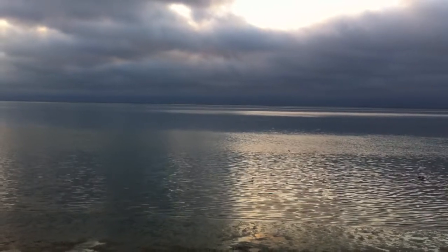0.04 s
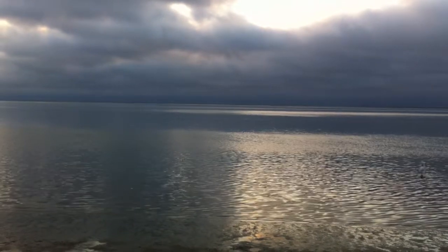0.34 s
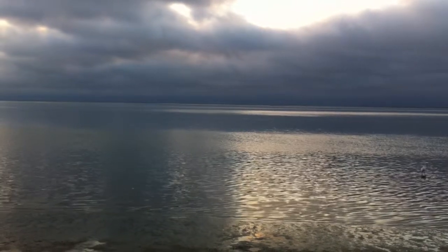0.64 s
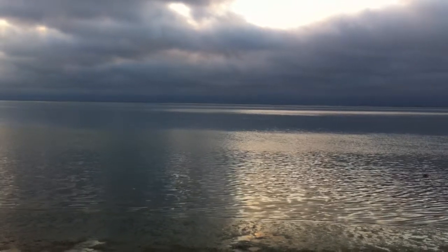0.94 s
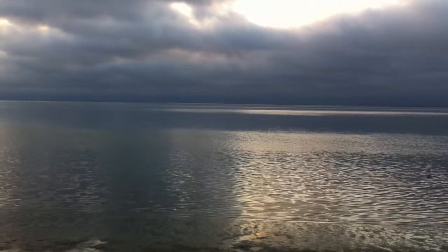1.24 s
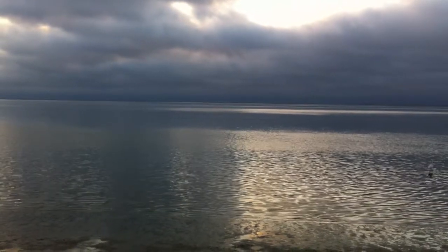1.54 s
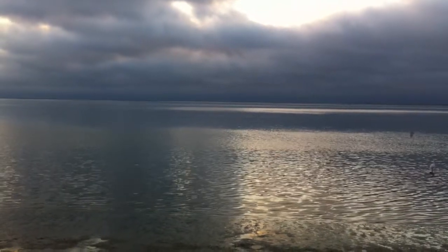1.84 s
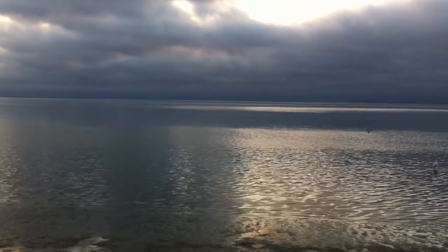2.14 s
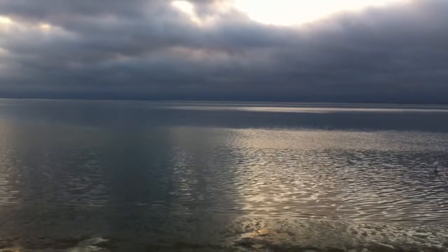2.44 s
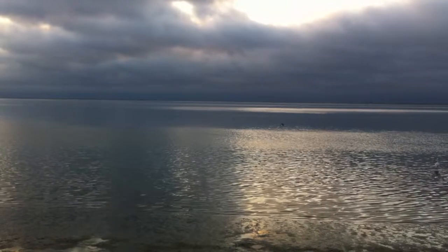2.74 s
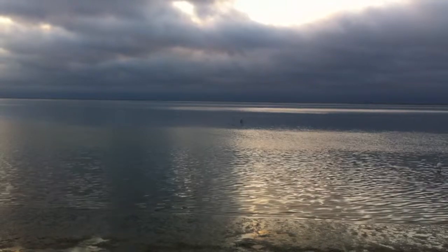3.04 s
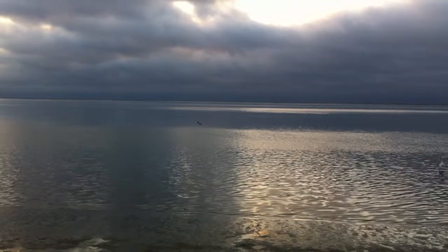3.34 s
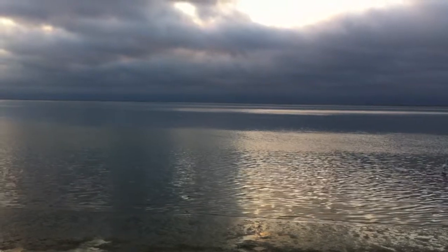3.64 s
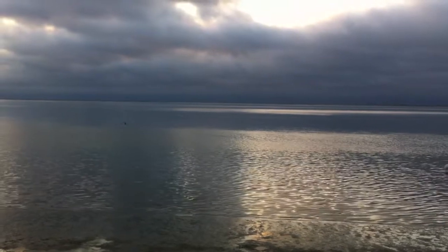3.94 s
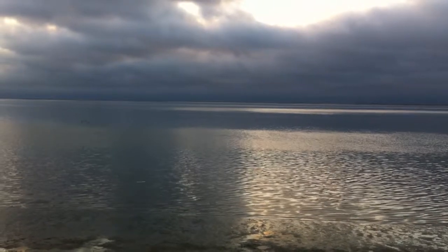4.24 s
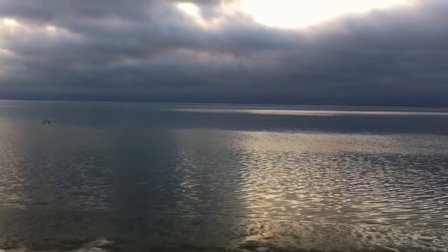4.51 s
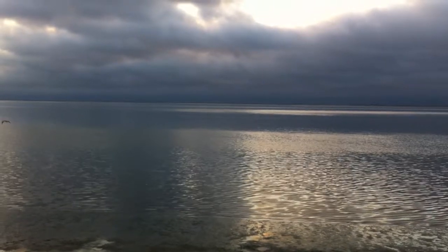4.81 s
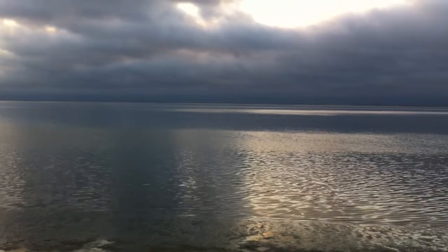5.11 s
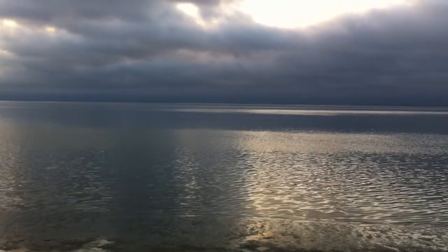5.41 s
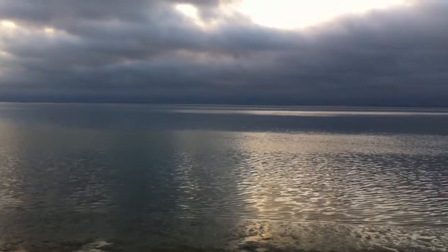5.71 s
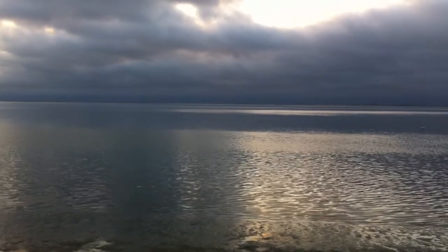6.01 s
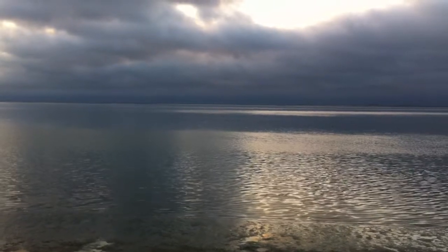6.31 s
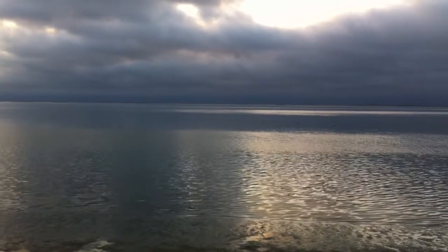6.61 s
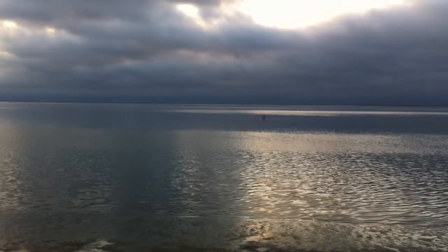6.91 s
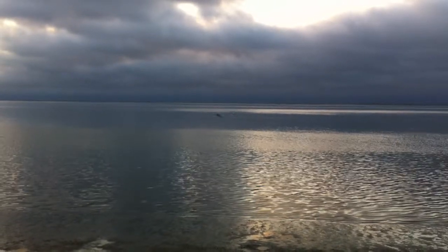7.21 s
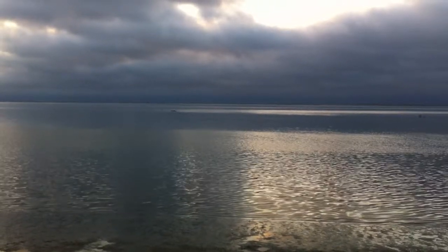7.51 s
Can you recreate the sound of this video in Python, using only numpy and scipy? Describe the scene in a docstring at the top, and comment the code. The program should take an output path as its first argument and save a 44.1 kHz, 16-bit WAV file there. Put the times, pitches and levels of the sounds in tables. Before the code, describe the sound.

A light breeze buffets the microphone on a calm lagoon shore, making an uneven low rumble with soft thuds. A distant engine roars at first, then gradually dulls and fades. Wavelets hiss faintly on the sand and small bubbles pop at the water's edge. Far birds give thin whistles early on and a few short buzzy chirps later, with faint hoarse calls and quick piping near the end.

```python
"""A light breeze buffets the microphone on a calm lagoon shore, over the roar of a far engine that dulls
and fades as the air swallows its treble. Wavelets hiss and fizz up the sand, and small bubbles pop at
the water's edge, each a tearing film over a ringing cavity. Shore birds give thin high whistles,
buzzy pulsed chirps and, near the end, two hoarse falling calls and a quick run of piping notes."""
import sys
import numpy as np
from scipy import signal
from scipy.fft import rfft, irfft, next_fast_len
from scipy.io import wavfile
from scipy.ndimage import uniform_filter1d

SR = 44100
rng = np.random.default_rng(int(sys.argv[2]) if len(sys.argv) > 2 else 0)


def log_audio(samples):
    """Write samples as a 16-bit WAV file to the path given in sys.argv[1]."""
    # one column per channel
    frames = np.atleast_2d(samples).T
    # limit to full scale, then quantise
    limited = np.clip(frames, -1, 1)
    pcm = np.round(limited * 32767).astype(np.int16)
    wavfile.write(sys.argv[1], SR, pcm)


N = 333396
T = np.arange(N) / SR


def undb(db):
    """Decibels to gain."""
    return 10 ** (np.asarray(db) / 20)


def unit(x):
    """Scale to rms 1."""
    return x / np.sqrt(np.mean(x ** 2))


def curve(rows, column=1):
    """One column of a timed table at every sample."""
    rows = np.asarray(rows)
    return np.interp(T, rows[:, 0], rows[:, column])


def colour(x, points):
    """EQ a sound through (Hz, dB) points; rms 1."""
    hz, db = np.transpose(points)
    bins = np.maximum(np.fft.rfftfreq(len(x), 1 / SR), 1)
    gain = undb(np.interp(np.log(bins), np.log(hz), db))
    return unit(irfft(rfft(x) * gain, len(x)))


def noise(points):
    """Coloured noise, rms 1."""
    return colour(rng.standard_normal(next_fast_len(N)), points)[:N]


def walk(rate):
    """Random levels held 1 / rate s and slewed; spread 1."""
    hold = max(int(SR / rate), 1)
    steps = np.repeat(rng.standard_normal(N // hold + 1), hold)
    return unit(uniform_filter1d(steps, hold)[:N])


def jitter(length, size):
    """Quick unsteadiness, smoothed over size samples; spread 1."""
    return unit(uniform_filter1d(rng.standard_normal(length), size))


def waver(shape, bands, frames):
    """Random levels shared by neighbouring bands and moments; spread 1."""
    field = uniform_filter1d(rng.standard_normal(shape), bands, axis=0)
    return unit(uniform_filter1d(field, frames, axis=1))


def even(x, seconds):
    """Take the slow swells out of a noise and keep its fast flutter."""
    return x / np.sqrt(uniform_filter1d(x ** 2, int(seconds * SR)) + 1e-9)


def drift_db(hz, times, tables, width_octaves):
    """Gain of sweeping bell filters, by frequency and time."""
    db = 0
    for rows in tables:
        centre, gain = (np.interp(times, T, curve(rows, column)) for column in (1, 2))
        db = db + gain * np.exp(-(np.log2((hz[:, None] + 1) / centre) / width_octaves) ** 2)
    return db


def add(out, start, sound):
    """Mix a short sound in at start seconds."""
    first = int(start * SR)
    part = sound[:max(N - first, 0)]
    out[first:first + len(part)] += part


def note(length, pitches_hz, hoarse):
    """One whistled note gliding through a start, middle and end pitch."""
    progress = np.linspace(0, 1, int(length * SR))
    glide = np.polyval(np.polyfit([0, .5, 1], pitches_hz, 2), progress)
    pitch = glide * (1 + hoarse * jitter(SR, size=60)[:len(progress)])
    return np.sqrt(np.abs(np.sin(np.pi * progress))) * np.sin(2 * np.pi * np.cumsum(pitch) / SR)


# The rise and fall of the breeze. Each row: time in seconds, relative level in dB.
GUSTS = [(0, -46), (.11, -37.5), (.22, -40.5), (.39, -42), (.45, -44), (.58, -46.5), (.65, -39.5),
         (.72, -43.5), (.78, -46.5), (.86, -41.5), (.91, -51.5), (1.0, -36.5), (1.13, -48), (1.27, -44),
         (1.37, -50.5), (1.45, -43), (1.62, -39.5), (1.85, -42), (1.92, -44), (2.1, -39), (2.34, -40.5),
         (2.52, -37.5), (2.66, -43.5), (2.75, -45.5), (2.98, -39), (3.06, -40.5), (3.15, -38), (3.35, -42),
         (3.45, -37.5), (3.55, -43.5), (3.74, -36), (3.86, -38.5), (3.98, -40), (4.15, -42), (4.29, -41),
         (4.43, -45), (4.53, -42), (4.62, -46), (4.86, -43.5), (4.93, -45.5), (5.0, -36), (5.22, -45),
         (5.39, -38.5), (5.6, -40), (5.71, -43.5), (5.78, -39.5), (5.92, -37.5), (6.12, -39.5),
         (6.33, -38.5), (6.4, -44.5), (6.48, -37), (6.56, -40), (6.66, -35.5), (6.76, -38), (6.84, -35),
         (6.92, -41.5), (7.05, -38), (7.2, -37.5), (7.32, -42), (7.44, -37), (7.56, -41.5)]
# The roughness of the air. Each row: time in seconds, small-eddy trim on the gust level in dB.
TURBULENCE = [(0, -13), (.9, -17), (1.65, -8.5), (2.05, -12), (2.4, -12.5), (3.1, -12.5), (3.8, -13.5),
              (4.3, -16), (4.45, -22), (4.8, -13.5), (5.05, -9.5), (5.4, -14.5), (5.95, -11), (6.1, -13),
              (6.22, -8), (6.4, -11.5), (6.8, -14), (7.25, -9), (7.56, -15)]
# The tone of the large eddies, then the small. Each row: frequency in Hz, relative level in dB.
BUFFET_COLOUR = [(20, -29), (38, -20), (60, -17.5), (80, -13.5), (100, -9), (125, -2), (155, 0.5),
                 (200, -3.5), (255, -4.5), (330, -14), (450, -22), (900, -64)]
EDDY_COLOUR = [(120, -33), (230, -11), (310, 2), (400, -5.5), (500, -11), (650, -20), (1000, -30.5),
               (2000, -65)]


def wind(buffet_db=0.58, eddy_db=2.5, flutter_db=2.5, ride=1.05, cut_hz=90):
    """Large eddies buffet the microphone port; small ones ride on them and grow with the breeze."""
    gust_db = curve(GUSTS) + walk(rate=25)
    large = even(noise(BUFFET_COLOUR), seconds=.05)
    push = np.sqrt(uniform_filter1d(large ** 2, size=400) + 1e-9)
    small = noise(EDDY_COLOUR) * push ** ride
    flutter = undb(flutter_db * np.tanh(walk(rate=90)))
    small = even(small * flutter, seconds=.08)
    strength = np.hypot(undb(gust_db + curve(TURBULENCE)), flurries())
    pressure = thuds(large * undb(gust_db + buffet_db)) + small * strength * undb(eddy_db) + flicks()
    # the microphone is deaf to the deepest bass
    return signal.sosfilt(signal.butter(3, cut_hz, "highpass", fs=SR, output="sos"), pressure)


# The engine fading away. Each row: time in seconds, level before filtering in dB, treble cutoff in Hz.
ENGINE_FADE = [(0, -48, 1950), (.7, -48.5, 2100), (1, -46.5, 2230), (1.35, -46, 2500), (1.6, -47.5, 2000),
               (1.88, -49.5, 1600), (2.02, -52, 1460), (2.65, -50, 1410), (3.1, -55, 1320),
               (3.8, -52.5, 1230), (4.2, -52.5, 1230), (4.6, -54, 1310), (5.1, -53.5, 1200),
               (5.6, -57, 950), (6.1, -57.5, 800), (6.35, -55.5, 800), (7.56, -67, 750)]
# The body of the roar. Each row: frequency in Hz, relative level in dB.
ENGINE_COLOUR = [(80, -16.5), (200, 0.5), (400, -2.5), (490, 3), (590, -0.5), (700, 0), (850, -2),
                 (1050, -3), (1450, -5), (1850, -7), (2300, -10), (5000, -26)]
# A resonance and a hollow sweeping the roar. Each row: time in seconds, centre in Hz, gain in dB.
ROAR_PEAK = [(0, 620, 0.5), (1.4, 657, 0.5), (1.82, 716, 8.5), (2.05, 700, 0.5), (4.0, 800, 2.5),
             (4.55, 875, 6), (4.75, 1120, 3), (5.0, 1200, -2)]
ROAR_HOLLOW = [(1.3, 1380, -3), (1.65, 1430, -13), (2.0, 1600, -3), (2.3, 1750, -6), (2.7, 1450, 3),
               (2.95, 1330, -15), (3.2, 1280, 0), (4.7, 1040, -3.5), (5.1, 1000, -7), (5.8, 950, 0)]


def engine(steepness=16, waver_db=1.64, edge_db=-0.5):
    """A far roar: moving air makes each band waver, and distance closes off the treble."""
    hz, times, bands = signal.stft(noise(ENGINE_COLOUR), SR, nperseg=1024)
    over_cutoff = (hz[:, None] + 1) / np.interp(times, T, curve(ENGINE_FADE, column=2))
    lowpass = 1 / np.sqrt(1 + over_cutoff ** steepness)
    db = waver_db * waver(bands.shape, bands=3, frames=18)
    db += edge_db * np.exp(-(np.log2(over_cutoff) / 0.13) ** 2)
    db += drift_db(hz, times, (ROAR_PEAK, ROAR_HOLLOW), width_octaves=0.15)
    return signal.istft(bands * lowpass * undb(db), SR)[1][:N] * undb(curve(ENGINE_FADE))


# Open air with microphone hiss, then the far shore. Each row: frequency in Hz, relative level in dB.
AIR_COLOUR = [(30, -10.5), (300, 9.5), (800, -6), (1200, -7.5), (1700, -8.5), (2300, -18.5), (3500, -20),
              (5000, -29), (7000, -23), (11000, -24), (15500, -25.5)]
FAR_RUSH_COLOUR = [(300, -21), (800, 5.5), (1750, 0), (2300, -18), (4000, -50)]
# The fade of the far shore's rush. Each row: time in seconds, level in dB.
FAR_RUSH = [(0, -64.5), (6.1, -67), (7.1, -71.5), (7.56, -77)]


def air(air_db=-57.5, whine_db=-85, whine_hz=15000):
    """A bed of even hiss, a fading rush from the far shore and a very faint electronic whine."""
    hiss = undb(air_db) * noise(AIR_COLOUR)
    rush = undb(curve(FAR_RUSH)) * noise(FAR_RUSH_COLOUR)
    return hiss + rush + undb(whine_db) * np.sin(2 * np.pi * whine_hz * T)


# Wavelets running up the sand. Each row: crest in seconds, relative level in dB, swell in seconds.
WAVELETS = [(.35, -67.5, 0.4), (1.42, -64.5, 0.45), (3.1, -70, 0.16), (3.97, -67, 0.39), (5.78, -70, 0.13),
            (6.82, -75, 0.14), (7.16, -73, 0.023)]


def wash(calm_db=-70, fade_db_per_s=0.5, drain_ratio=0.95):
    """The envelope of water on sand: each wavelet swells and drains over a slowly fading calm."""
    power = undb(calm_db - fade_db_per_s * T) ** 2
    for crest, db, swell in WAVELETS:
        width = np.where(T < crest, swell, swell * drain_ratio)
        power += undb(db) ** 2 * np.exp(-((T - crest) / width) ** 2)
    return np.sqrt(power)


# The colour of the wash hiss, with peaks near 1.7, 4.8, 8.7 and 12 kHz. Each row: frequency in Hz, relative
# level in dB.
WASH_COLOUR = [(700, -28), (1700, 4.5), (2700, 0.5), (3400, 0.5), (3900, -2.5), (4800, 3), (5500, 1),
               (6300, -2.5), (7500, -7.5), (8700, -5.5), (10000, -12.5), (12000, -11), (15500, -33)]
# A bright spot and a hollow that move as the water runs up and drains; each can boost or cut.
# Each row: time in seconds, centre in Hz, gain in dB.
WASH_PEAK = [(0, 4900, -1.5), (.9, 4870, 2.5), (1.3, 5150, 2), (1.8, 5500, 0.5), (2.6, 5200, -2.5),
             (3.7, 4300, 2), (4.2, 4200, 2.5), (5.3, 4200, -0.5), (6.4, 3900, 0)]
WASH_HOLLOW = [(0, 3900, -5), (.8, 3900, -1.5), (1.3, 4150, 0.5), (1.8, 4530, -3.5), (2.6, 4900, 3),
               (3.6, 7200, -2), (4.3, 7200, -2), (5.3, 5230, -1), (6.4, 5200, 1)]


def ripples(trim_db=0.12, fizz_db=-7, bubbles_per_s=420, spread_db=3.5, shimmer_db=2.0):
    """Wavelets hiss up the sand in a shifting colour, with a fizz of tiny ringing bubbles."""
    fizz, t = np.zeros(N), np.arange(256) / SR
    for when, pitch, strength in rng.random((int(bubbles_per_s * N / SR), 3)):
        hz = 2800 * 4.5 ** pitch
        bubble = np.sin(2 * np.pi * hz * t) * np.exp(-t * hz / 2)
        add(fizz, when * N / SR, undb(spread_db * min(-np.log(strength), 3)) * bubble)
    water = noise(WASH_COLOUR) + undb(fizz_db) * colour(fizz, WASH_COLOUR)
    hz, times, bands = signal.stft(water, SR, nperseg=1024)
    db = shimmer_db * waver(bands.shape, bands=7, frames=9)
    db += drift_db(hz, times, (WASH_PEAK, WASH_HOLLOW), width_octaves=.14)
    return signal.istft(bands * undb(db), SR)[1][:N] * wash() * undb(trim_db)


# Thin, high whistles. Each row: start in seconds, length in seconds, pitch in Hz, level in dB.
WHISTLES = [(0.115, .25, 7105, -77), (.38, .16, 7095, -77), (.17, .22, 6500, -68.5), (.37, .18, 6515, -74),
            (.665, 0.1, 7100, -66), (.76, .23, 7085, -74), (.99, .09, 7070, -75.5), (1.44, .15, 7610, -76)]


def whistles(flicker_db=3.0):
    """Far birds hold a steady pitch; the level flickers on its way over the water."""
    out = np.zeros(N)
    for start, length, hz, db in WHISTLES:
        add(out, start, undb(db) * note(length, (hz, hz, hz), hoarse=0.0077))
    return out * undb(flicker_db * walk(rate=37))


# Soft wind thuds on the microphone. Each row: peak in seconds, level in dB, centre in Hz.
THUDS = [(.124, -33, 203), (.215, -32, 180), (.378, -35.5, 267), (0.663, -33, 157), (.872, -38.5, 197.6),
         (1.0, -36.5, 241), (1.055, -43, 202.6), (1.257, -35, 187), (1.305, -35, 171), (1.425, -36.5, 174),
         (1.716, -34, 182.3), (1.772, -33.5, 190.5), (1.811, -36.5, 234), (1.994, -30.5, 189),
         (2.075, -34.5, 163), (2.154, -34, 159.7), (2.275, -33, 162.8), (2.402, -33, 141.5),
         (2.496, -31, 157), (2.553, -34, 281), (2.804, -33, 195.5), (2.956, -31.5, 177.4),
         (3.016, -32, 180), (3.115, -31.5, 248), (3.493, -34.5, 286.4), (3.654, -34, 162),
         (3.729, -30.5, 163.6), (3.773, -30.5, 159.4), (3.829, -27.5, 160), (3.87, -30, 192),
         (4.008, -34.5, 253), (4.255, -33, 206), (4.324, -40, 248.4), (4.533, -34.5, 145),
         (4.81, -33, 167.5), (4.973, -33.5, 212.4), (5.015, -33, 158), (5.148, -32.5, 160),
         (5.254, -32.5, 241), (5.367, -30.5, 155.3), (5.547, -33, 149.5), (5.759, -34, 238),
         (5.904, -30, 182), (5.936, -30, 216.5), (5.955, -35.5, 248), (5.984, -33, 195), (6.28, -32, 174),
         (6.371, -32.5, 201), (6.477, -30.5, 154.3), (6.702, -31.5, 170.5), (6.807, -28.5, 167),
         (7.154, -27.5, 204.6), (7.182, -29, 253), (7.235, -26.5, 265.4), (7.379, -31.5, 192.4),
         (7.427, -30, 201.7), (7.45, -29.5, 164), (7.471, -30, 189)]


def thuds(bed, cycles=1.37, duck=0.79):
    """A strong eddy sweeps the wind bed aside and swings the pressure for a few cycles."""
    out, cover, t = np.zeros(N), np.zeros(N), np.arange(-2048, 2048) / SR
    for peak, db, hz in THUDS:
        envelope = np.exp(-(t * hz / cycles) ** 2)
        pitch = hz * (1 + 0.18 * jitter(len(t), size=200))
        swing = np.sqrt(2) * np.sin(2 * np.pi * (np.cumsum(pitch) / SR + rng.random()))
        add(out, peak + t[0], undb(db) * envelope * swing)
        add(cover, peak + t[0], envelope)
    return bed * (1 - np.clip(duck * cover, 0, 1)) + out


def plink(age, hz, seconds, glide=0.0406):
    """A bubble's ring swells and dies around age 0, rising in pitch."""
    pitch = hz * (1 + glide * np.tanh(age / seconds))
    return np.sin(2 * np.pi * np.cumsum(pitch) / SR) * np.exp(-np.abs(age) / seconds)


# Bubble pops at the water's edge. Each row: peak in seconds, relative level in dB, ring in Hz,
# swell in seconds, film crackle trim in dB, crackle cutoff in Hz.
POPS = [(.543, -52, 5500, .002, -3, 9000), (0.658, -49.5, 5060, .003, -0.5, 7000),
        (1.218, -53, 5060, .002, 3, 15000), (2.101, -51, 3400, 0.0024, -6, 8000),
        (2.119, -47, 5450, .0009, 5, 12000), (2.56, -41.5, 4940, .0016, -4.5, 9000),
        (2.582, -53, 4600, .003, -4, 9000), (2.614, -44.5, 3880, .0013, -18, 8000),
        (2.781, -51.5, 11500, .002, -2, 15000), (2.965, -51, 4600, .003, -5, 8000),
        (3.041, -42, 4550, .0021, -2, 9000), (3.0415, -43, 3150, 0.0014, -16, 8000),
        (3.452, -49.5, 5660, .0015, -0.5, 9000), (3.772, -51, 5760, .0015, -10, 9000),
        (3.943, -45.5, 4900, 0.0049, -1, 9500), (3.961, -48, 4500, .0033, -5, 9000),
        (4.296, -41, 4500, 0.0021, -4, 15000), (4.367, -40, 5220, 0.00073, -1.5, 7500),
        (4.368, -45, 3600, .001, -8, 7000), (4.796, -44.5, 4700, 0.0016, -2.5, 8000),
        (4.867, -42.5, 8430, .0009, 5, 9500), (4.928, -48, 4510, 0.0034, -22, 8000),
        (5.17, -58, 4440, 0.004, 4, 12000), (5.822, -42, 4750, .004, -10, 13000),
        (5.823, -47, 1818, .004, -8, 3000), (5.875, -54, 4800, .002, -10, 8000),
        (6.075, -45.5, 9000, .0025, -5, 14000), (6.076, -47.5, 1860, 0.0033, -6, 3000),
        (6.086, -50, 4800, 0.0013, -8, 8000), (6.523, -55, 5200, .0018, -4, 9000),
        (6.68, -54, 5300, .003, -18.5, 8000), (6.75, -40.5, 4900, .0017, -3, 8040),
        (6.9, -54, 4650, .002, -10, 9000), (7.012, -56, 3680, .003, 0.5, 12000)]
# The crackle of a bursting film. Each row: frequency in Hz, relative level in dB.
FILM_COLOUR = [(800, -22), (1800, 4), (3500, 5.5), (5200, 12.5), (7200, 0), (8800, 7.5), (10500, -1),
               (12500, 12), (15500, -28)]


def pops(ring_db=-6.5, ring_s=0.002, cluster_db=-9, cluster_s=0.00083, scatter_octaves=0.31,
         snap_db=-5.5, grit_db=4.0, tail_db=-24, tail_s=.018, lead_s=.02, cluster_count=12):
    """A film tears with a crackle, the cavity under it plinks, and lesser bubbles ring around it."""
    out, t = np.zeros(N), np.arange(4096) / SR - lead_s
    tail = undb(tail_db) * (t > 0) * np.exp(-np.abs(t) / tail_s)
    for peak, db, hz, swell, film_db, dull_hz in POPS:
        envelope = np.exp(-np.abs(t / swell) ** 0.61)
        cluster = 0
        for late, detune in rng.standard_normal((cluster_count, 2)):
            weight = np.exp(-(late ** 2 + detune ** 2) / 5)  # outliers are quieter
            cluster += weight * plink(t - late * swell, hz * 2 ** (scatter_octaves * detune), cluster_s)
        cluster = undb(cluster_db) * unit(cluster) * np.sqrt(np.mean(envelope ** 2) / 2)
        ring = undb(ring_db) * plink(t, hz, min(swell, ring_s))
        dulled = [(f, level - 10 * np.log10(1 + (f / dull_hz) ** 6)) for f, level in FILM_COLOUR]
        grit = rng.standard_normal(len(t)) * undb(grit_db * jitter(len(t), size=30))
        crackle = undb(snap_db + film_db) * colour(grit, dulled) * (envelope + tail)
        add(out, peak - lead_s, undb(db) * (ring + cluster + crackle))
    return out


# Quick ruffles in the wind. Each row: peak in seconds, relative level in dB.
FLURRIES = [(.63, -42), (1.75, -45), (2.551, -39), (2.99, -44), (3.23, -48), (3.46, -48), (3.68, -47),
            (3.77, -41.5), (4.32, -42.5), (5.08, -45), (5.78, -45), (5.93, -45), (6.27, -51), (6.48, -48),
            (6.62, -49), (6.7, -51), (6.81, -49), (7.15, -44.5), (7.262, -38), (7.421, -39.5)]


def flurries(swell_s=0.012):
    """The envelope of small eddies breaking into brief flurries."""
    return sum(undb(db) * np.exp(-np.minimum(((T - peak) / swell_s) ** 2, 20)) for peak, db in FLURRIES)


# Light wind taps. Each row: peak in seconds, relative level in dB, centre in Hz.
FLICKS = [(2.227, -45, 480), (3.824, -37.5, 480), (4.322, -37, 400), (5.354, -57, 480), (5.896, -41, 470),
          (6.373, -41, 440), (6.511, -45, 520), (6.618, -39, 480), (6.649, -42, 500), (6.834, -41, 460),
          (6.99, -39, 446), (7.233, -47, 453), (7.348, -34.5, 375), (7.419, -40, 460)]


def flicks(trim_db=3.0, cycles=0.95):
    """A tiny eddy flicks the rim of the microphone port with a swing or two of pressure."""
    out, t = np.zeros(N), np.arange(-1024, 1024) / SR
    for peak, db, hz in FLICKS:
        envelope = np.exp(-(t * hz / cycles) ** 2)
        swing = np.sin(2 * np.pi * (hz * t + rng.random()))
        add(out, peak + t[0], undb(db + trim_db) * envelope * swing)
    return out


# Buzzy chirps. Each row: start in seconds, length in seconds, pitch atop the arch in Hz, relative level
# in dB, pulses per second, odd-partial trim in dB, trim of the top two partials in dB, arch and rasp as
# fractions of the pitch, swell from start to end in dB, pulse sharpness as an exponent, scrape in dB.
CHIRPS = [(2.232, .05, 1970, -53, 130, -19, -1, .035, 0.06, -2, 1.4, -13),
          (3.522, .076, 1940, -56.5, 98, -21, -9, 0.18, .09, -3, 1.4, -12),
          (6.703, 0.085, 1715, -48.5, 97.4, 1, -3, 0.04, 0.02, -2, 1.4, -7.5),
          (7.499, .078, 1980, -52.5, 100, -2, 4, .13, 0.02, 9, .5, -2)]
# The chirp's timbre. Each entry: relative level in dB, from the first partial to the fifth.
CHIRP_PARTIALS_DB = [-14, -1.5, -3.5, -14, -23]


def chirps(trim_db=1.5, sweep=0.044, droop=0.19, hoarse=0.039, strain_db=-5, uneven_db=0.5):
    """Arched bird calls chopped into pulses, bright and raspy mid-call where they are pushed hardest."""
    out = np.zeros(N)
    scrape_colour = [(2500, -16), (3800, -5), (4900, 4), (6000, -9), (9000, -32)]
    for start, length, hz, db, rate, odd_db, top_db, arch, rasp, swell_db, sharp, scrape_db in CHIRPS:
        n = int(length * SR)
        t = np.arange(n) / SR
        position = 2 * t / length - 1  # -1 to 1 across the call
        effort = np.abs(1 - position ** 2)
        cycle = t * rate % 1
        fall = arch * (1 - effort) * (1 + droop * position)  # the pitch sinks further at the end
        roughness = rasp * effort ** 2 * jitter(SR, size=24)[:n]
        roughness += hoarse * (1 - effort / 2) * jitter(SR, size=90)[:n]
        pitch = hz * (1 - fall + sweep * (cycle - .5) + roughness)
        phase = 2 * np.pi * np.cumsum(pitch) / SR
        # the second partial carries the ends of the call and gives way as the odd ones break in
        second_drive = effort ** 0.28 * undb(strain_db * undb(odd_db) * (effort ** 2 - .5))
        tone = 0
        for k, partial_db in enumerate(CHIRP_PARTIALS_DB, 1):
            gain = undb(partial_db + k % 2 * odd_db + (k > 3) * top_db)
            tone += gain * (second_drive if k == 2 else effort) * np.sin(k * phase)
        scrape = undb(scrape_db) * effort ** 3 * colour(rng.standard_normal(SR), scrape_colour)[:n]
        pulses = np.abs(np.sin(np.pi * cycle)) ** sharp * undb(uneven_db * jitter(SR, size=300)[:n])
        add(out, start, undb(db + trim_db + swell_db * position / 2) * (tone + scrape) * pulses)
    return out


# Two short, hoarse calls. Each row: start in seconds, level in dB.
FALLING_CALLS = [(6.388, -64.5), (6.483, -63)]


def falling_calls(length_s=.044, glide_hz=(2780, 2420, 2140), flicker_db=3.0):
    """A far bird's rough downward glides, flickering on their way over the water."""
    out = np.zeros(N)
    for start, db in FALLING_CALLS:
        add(out, start, undb(db) * note(length_s, glide_hz, hoarse=0.15))
    return out * undb(flicker_db * walk(rate=37))


def piping(start_s=6.777, count=9, step_s=.0735, note_s=.046, first_db=-67.5, swell_db_per_s=5.5,
           first_hz=1870, climb_hz_per_s=64, arch_hz=45, droop_hz=65,
           slur_start_s=7.46, slur_db=-61, flicker_db=0.5):
    """A shore bird pipes an even run of drooping notes, climbing and swelling, then slurs upward."""
    out = np.zeros(N)
    for since in np.arange(count) * step_s:
        hz = first_hz + climb_hz_per_s * since
        pip = note(note_s, (hz, hz + arch_hz, hz - droop_hz), hoarse=0.014)
        add(out, start_s + since, undb(first_db + swell_db_per_s * since) * pip)
    slur = note(length=0.059, pitches_hz=(1910, 2060, 2180), hoarse=.012)
    add(out, slur_start_s, undb(slur_db) * slur)
    return out * undb(flicker_db * walk(rate=40))


def scene():
    """Breeze, engine, water and birds meet at one microphone."""
    shore = wind() + engine() + ripples() + pops()
    birds = chirps() + whistles() + falling_calls() + piping()
    return (shore + birds + air())[None]


def record(dry, top_hz=15800):
    """A steep low-pass takes off the very top."""
    return signal.sosfilt(signal.ellip(10, .2, 70, top_hz, fs=SR, output="sos"), dry)


dry = scene()
out = record(dry)
log_audio(out)
```